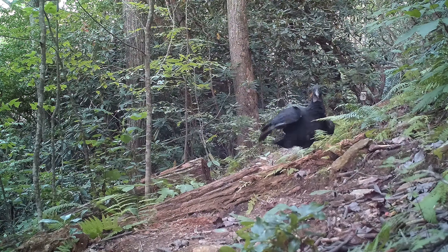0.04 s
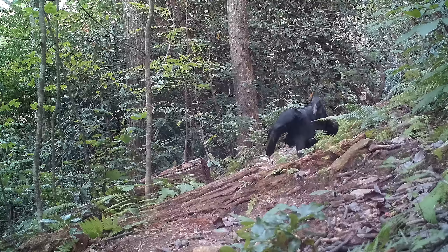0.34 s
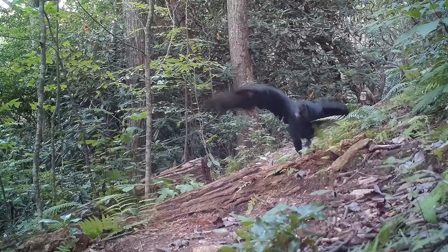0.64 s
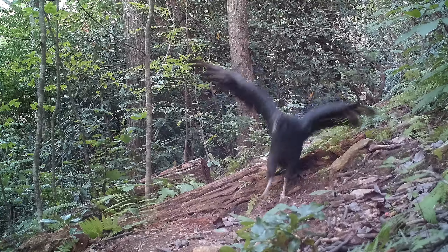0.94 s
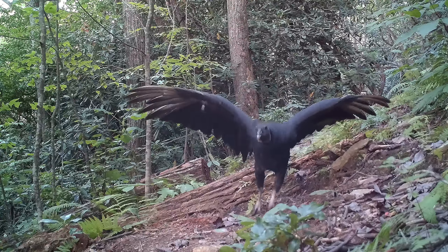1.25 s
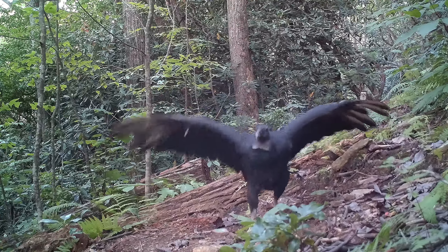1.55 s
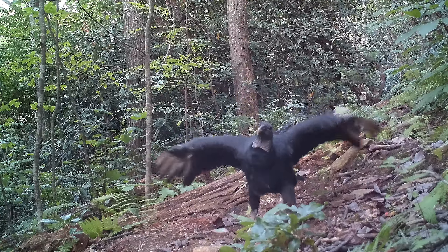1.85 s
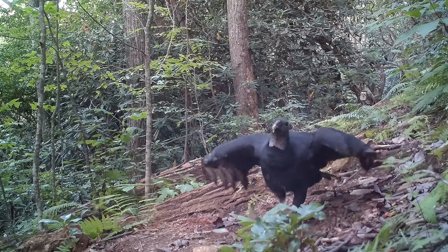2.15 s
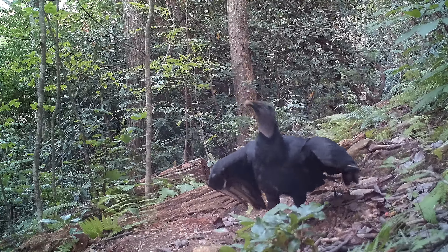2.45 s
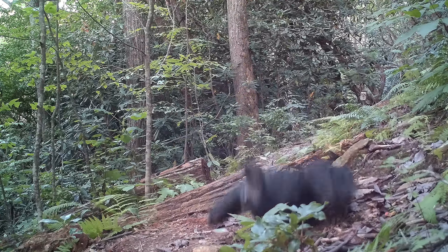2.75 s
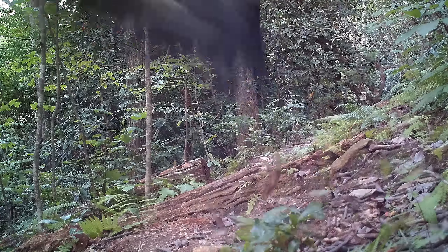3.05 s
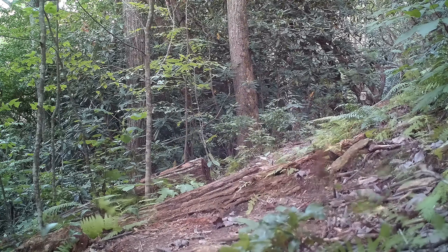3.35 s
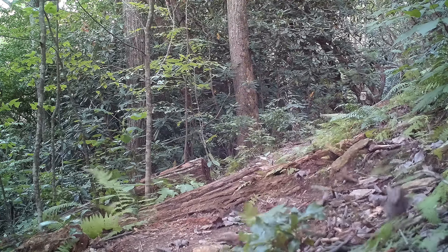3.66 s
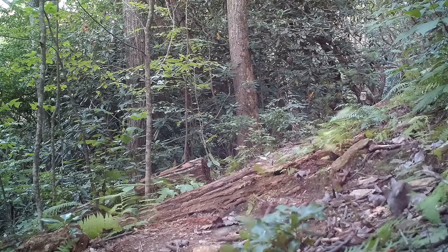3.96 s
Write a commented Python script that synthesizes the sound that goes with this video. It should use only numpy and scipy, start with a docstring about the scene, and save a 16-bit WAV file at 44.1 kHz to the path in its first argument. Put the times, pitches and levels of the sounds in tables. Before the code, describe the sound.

A vulture takes off in a quiet forest. Over a steady high insect chorus it shuffles on dry leaves and snaps twigs, then its stiff feathers rattle and three heavy wingbeats pass close overhead, buffeting the microphone.

```python
"""Vulture taking off from a wooded slope

Over still air and a steady insect chorus, a vulture shuffles its wings and steps on dry litter.
Then it takes off: leaves stir, stiff feathers rattle as they scrape past, and three heavy wingbeats
pass close overhead, each a thump of air, a whoosh, a feather hiss and a softer upstroke.
The ground and the trunks add faint echoes. The sound is mono, alike on both channels."""
import sys
import numpy as np
from scipy import signal
from scipy.fft import rfft, irfft
from scipy.io import wavfile

SR = 44100
rng = np.random.default_rng(int(sys.argv[2]) if len(sys.argv) > 2 else 0)


def file_out(sig):
    """Save sig as 16-bit WAV at sys.argv[1]."""
    # one column per channel
    cols = np.atleast_2d(sig).T
    # limit, then scale
    lim = np.clip(cols, -1, 1)
    pcm = np.round(lim * 32767).astype(np.int16)
    wavfile.write(sys.argv[1], SR, pcm)


N = 176400
TIME = np.arange(N) / SR


def amp(db):
    """Decibels to gain."""
    return 10 ** (np.asarray(db) / 20)


def unit_rms(x):
    """Scales to an rms of one."""
    return x / np.sqrt(np.mean(x ** 2) + 1e-20)


def add(mix, start_s, sound):
    """Drops a sound into the mix."""
    part = mix[round(start_s * SR):][:len(sound)]
    part += sound[:len(part)]


def octaves(size):
    """The bins of a spectrum, in octaves."""
    return np.log2(np.fft.rfftfreq(size, 1 / SR) + 1)


def colour(x, eq, tilt_db=0):
    """Applies an EQ curve and a tilt per octave, at rms one."""
    hz, db = np.transpose(eq)
    bins = octaves(len(x))
    curve_db = np.interp(bins, np.log2(hz), db) + tilt_db * np.clip(bins - np.log2(hz[0]), 0, None)
    return unit_rms(irfft(rfft(x) * amp(curve_db), len(x)))


def wander(size, hz):
    """A random drift at about the given rate."""
    return np.interp(np.arange(size) * hz / SR, np.arange(size), rng.standard_normal(size))


def crackle(size, grain_db, clump_hz):
    """Noise that comes in tiny uneven clumps."""
    return rng.standard_normal(size) * amp(grain_db * np.clip(wander(size, clump_hz), -2, 2))


def swell(length_s, peak):
    """A smooth arch; peak is the share of its length at which it tops."""
    progress = np.arange(0, length_s, 1 / SR) / length_s
    return np.sin(np.pi * np.interp(progress, [0, peak, 1], [0, .5, 1])) ** 2


def resonate(x, hz, width_hz):
    """A steep resonance that follows a pitch curve, at rms one."""
    carrier = np.exp(2j * np.pi * np.cumsum(hz * np.ones(len(x))) / SR)
    pole = np.exp(-np.pi * width_hz / SR)
    return unit_rms((carrier * signal.lfilter([1], [1, -2 * pole, pole * pole], x / carrier)).real)


def forest_air():
    """Still air under the trees: a soft, dark bed of noise."""
    # air spectrum: f/Hz, level/dB
    air_eq = [(20, -5), (38, 0.5), (65, -0.5), (95, -3), (128, 2), (180, -3), (400, -6.5), (1000, -11.5),
              (2200, -16.5), (5000, -20.5), (9000, -24), (15500, -28)]
    return amp(-41) * colour(rng.standard_normal(N), air_eq)


def insects():
    """A chorus of insects merges into one high, finely pulsing band."""
    # chorus spectrum: f/Hz, level/dB
    chorus_eq = [(4000, -73), (5400, -22), (5850, -14), (6200, -6.5), (6550, -1.5), (6850, -7.5),
                 (7200, -16), (7800, -28.5), (10000, -61)]
    chorus = colour(crackle(N, grain_db=1, clump_hz=89.2), chorus_eq)
    return amp(-39.5 + .5 * wander(N, hz=7.56)) * chorus


def rustles(attack_s=0.005):
    """Feathers brush over each other and the litter in sprays of small grains that die away."""
    # brushes: t/s, length/s, level/dB, tilt/(dB per octave), fade-out/share of length
    brushes = [(0.482, 0.19, -51, 1, 0.49), (0.97, 0.42, -49, -2.5, 0.53), (1.102, 0.028, -45, -5, 0.68),
               (1.554, 0.056, -35, -1, 0.21), (1.601, 0.15, -43.5, 0, 0.72),
               (1.728, 0.068, -33.5, -1.5, 0.22), (1.795, 0.25, -44, 0, 0.78),
               (2.246, 0.047, -39, -1.5, .6), (2.277, 0.14, -38, -1.5, .4), (2.498, 0.14, -42.5, -3, 0.6),
               (2.686, 0.018, -37, 0, 0.55), (2.737, 0.034, -42, 3, 0.61), (2.815, .02, -42, 2, .3),
               (2.983, 0.066, -41.5, 1, .2), (3.029, 0.075, -34.5, -1, 0.55)]
    # brushing spectrum: f/Hz, level/dB
    brush_eq = [(300, -47), (1100, -12), (1900, -5), (3100, -1.5), (6000, 1), (8500, -3.5), (12000, -9.5),
                (15500, -22)]
    out = np.zeros(N)
    for start, length, db, tilt_db, fade in brushes:
        t = np.arange(0, length, 1 / SR)
        envelope = np.minimum(t / attack_s, 1) * np.minimum((1 - t / length) / fade, 1)
        clumps = unit_rms(amp(3 * wander(len(t), hz=123)))
        grains = colour(crackle(len(t), grain_db=4, clump_hz=1191), brush_eq, tilt_db)
        add(out, start, amp(db) * envelope * clumps * grains)
    return out


def snaps(attack_s=0.00026, tip_octaves=0.12, size=2048):
    """Twigs and quills snap: short dry cracks, each centred on one pitch."""
    # cracks: t/s, level/dB, f/Hz, decay/s, roll-off either side of f/(dB per octave)
    cracks = [(1.0988, -27, 2500, 0.0011, 16), (1.566, -28, 9500, .002, 12),
              (1.580, -22.5, 6860, 0.0012, 12), (1.5946, -19.5, 7300, 0.0012, 10),
              (1.7758, -11.5, 4400, 0.00065, 11.5), (1.779, -26.5, 4660, 0.0053, 30),
              (1.827, -22, 6350, 0.00078, 16), (2.2495, -29, 4400, 0.00061, 12),
              (2.3437, -28.5, 4200, 0.0017, 10), (2.351, -27.5, 6000, 0.0018, 21),
              (2.504, -33, 3200, 0.0019, 14), (2.5195, -23, 3780, 0.002, 20),
              (3.047, -28.5, 3200, 0.006, 17), (3.111, -14, 5100, 0.00097, 30),
              (3.136, -6, 7200, 0.0014, 71), (3.2064, -14, 5200, .0007, 32),
              (3.2194, -20, 1880, 0.0038, 92), (3.3081, -9, 5900, 0.00046, 38),
              (3.3372, -13.5, 5713, .0008, 38), (3.412, -18.5, 5320, 0.009, 19),
              (3.456, -25, 4000, .007, 4), (3.612, -9.5, 5340, 0.0034, 13), (3.631, -24, 5500, .003, 3),
              (3.772, -23.5, 4100, 0.0038, 7), (3.821, -23, 4800, .003, 15), (3.875, -21, 5000, 0.003, 14),
              (3.9379, -15.5, 4520, 0.0028, 25)]
    t, out = np.arange(size) / SR, np.zeros(N)
    for start, db, hz, decay, slope_db in cracks:
        spectrum = amp(-slope_db * np.hypot(octaves(size) - np.log2(hz), tip_octaves))
        burst = irfft(spectrum * np.exp(2j * np.pi * rng.random(len(spectrum))))
        envelope = np.minimum(t / attack_s, 1) * np.exp(-t / decay)
        add(out, start, amp(db) * unit_rms(burst * envelope) * np.sqrt(decay * SR / size))
    return out


def wake():
    """Stirred leaves and feathers fizz while the bird's draught buffets the microphone."""
    # fader moves: t/s, leaves level/dB, draught level/dB
    faders = [(3.05, -36, -68), (3.1, -39.5, -58), (3.14, -23.5, -53), (3.2, -32, -52), (3.24, -20.5, -49),
              (3.29, -27.5, -34), (3.362, -25.5, -34), (3.38, -30.5, -43), (3.429, -25, -25),
              (3.5, -27, -48), (3.545, -27, -29), (3.58, -31, -33), (3.645, -24, -38), (3.7, -30, -40),
              (3.79, -30.5, -39), (3.845, -25, -34), (3.91, -35, -38), (3.948, -22.5, -38),
              (3.965, -35.5, -51), (4, -30.5, -39)]
    # leaf spectrum: f/Hz, level/dB
    leaves_eq = [(150, 2.5), (600, -0.5), (1000, -1), (2500, 0.5), (5000, 1), (7500, -1.5), (10000, -5),
                 (13000, -9.5), (15500, -21)]
    # draught spectrum: f/Hz, level/dB
    draught_eq = [(15, -6), (28, -4), (45, -1), (90, -11), (140, -11), (400, -39), (2000, -70)]
    times, leaves_db, draught_db = np.transpose(faders)
    leaves = colour(crackle(N, grain_db=2.5, clump_hz=600.3), leaves_eq)
    draught = colour(rng.standard_normal(N), draught_eq)
    return (amp(np.interp(TIME, times, leaves_db, left=-120)) * leaves
            + amp(np.interp(TIME, times, draught_db, left=-120)) * draught)


def feather_scrape(max_slips=220, spread_db=4.5, detune=0.045, ring_size=768):
    """Stiff feathers catch and slip; each slip rings the quills, whose pitches shift as the wing bends."""
    # fader moves of three resonance groups: t/s, treble level/dB, bass level/dB, middle level/dB
    faders = [(3.09, -42, -40, -53), (3.117, -16, -23, -23), (3.14, -17, -24.5, -30),
              (3.168, -19, -28.5, -25), (3.186, -27.5, -35, -34), (3.213, -19, -28.5, -25.5),
              (3.224, -19, -40, -25), (3.232, -24.5, -38, -33), (3.28, -23.5, -34.5, -29),
              (3.306, -15, -28, -28.5), (3.352, -31, -44, -46), (3.36, -31, -40, -37)]
    # stick-slip: t/s, rate/Hz, jitter/share of period, pitch ratios for treble, bass and middle
    slips = [(3.089, 378, 0.28, 0.85, 0.82, 1.15), (3.116, 365.8, .28, 0.97, 1.11, 1.06),
             (3.142, 354.5, 0.31, 0.98, 0.78, 0.86), (3.165, 347.8, 0.31, 1, 1, 1.03),
             (3.201, 177.5, .15, 0.99, 0.9, 1), (3.226, 224.7, .2, 0.993, 1.04, 1.01),
             (3.245, 501, .5, 1.03, 1.13, 1.01), (3.28, 269.2, 0.038, 0.97, 1.26, 0.96),
             (3.31, 270, .04, 1.09, 1.22, 0.9), (3.358, 320, 0.045, 0.97, 0.96, 0.81)]
    # quill modes: f/Hz, level/dB, decay/s, group (0 treble, 1 bass, 2 middle)
    modes = [(5170, 5, 0.001, 0), (5340, 10, 0.00024, 0), (3890, -4.5, 0.00082, 0), (6670, -1, 0.00065, 0),
             (416, 3, 0.0021, 1), (220, -2.5, 0.0035, 1), (1845, 0, 0.00098, 2)]
    # band-pass of each group: gain/dB, low edge/Hz, high edge/Hz
    groups = [(-1.5, 2400, 7900), (2.5, 90, 630), (1, 1070, 2740)]
    times, *levels = np.transpose(faders)
    slip_times, rate, jitter, *bends = np.transpose(slips)
    now, end = times[0], times[-1]
    t, stems = np.arange(ring_size) / SR, np.zeros((len(groups), N))
    for late, force, *offsets in rng.standard_normal((max_slips, 2 + len(modes))):
        period = 1 / np.interp(now, slip_times, rate)
        strength = np.sqrt(period) * amp(spread_db * np.tanh(force))
        for (hz, db, decay, group), offset, phase in zip(modes, offsets, rng.random(len(modes))):
            pitch = hz * np.interp(now, slip_times, bends[round(group)]) * (1 + detune * offset)
            envelope = (t / decay) ** .35 * np.exp(-t / decay)
            ring = envelope * np.sin(2 * np.pi * (pitch * t + phase))
            if now < end:
                add(stems[round(group)], now, strength * amp(db) * ring)
        now += period * np.exp(late * np.interp(now, slip_times, jitter))
    active, out = (TIME > times[0]) & (TIME < end), np.zeros(N)
    for stem, level, (gain_db, *edges) in zip(stems, levels, groups):
        rattle = signal.sosfilt(signal.butter(4, edges, "bandpass", fs=SR, output="sos"), stem)
        out += amp(np.interp(TIME, times, level) + gain_db) * rattle / rattle[active].std()
    return out


def thump(db, hz, length_s, sag=0.194, roughness=0.53):
    """The loaded wing flutters for a few low cycles, sagging in pitch."""
    arch = swell(length_s, peak=0.39) ** 0.61
    size = len(arch)
    pitch = hz * (1 + sag * np.linspace(.5, -.5, size) + 0.098 * wander(size, hz=202))
    flutter = unit_rms(np.sin(2 * np.pi * np.cumsum(pitch) / SR))
    rumble = resonate(rng.standard_normal(size), hz, width_hz=170)
    return amp(db) * arch * unit_rms(flutter + roughness * rumble)


def whoosh(db, low_hz, high_hz, high_db, rise_octaves, flutter_hz):
    """Air tears off the fluttering wing edge in two hollow bands that rise through the downstroke."""
    # spectrum of rushing air: f/Hz, level/dB
    rush_eq = [(40, -25), (200, 4.5), (370, -8), (520, -10), (900, -1), (1100, -6.5), (1350, -3.5),
               (1900, -12.5), (4000, -11), (15000, -45)]
    arch = swell(length_s=0.055, peak=0.39) ** 0.45
    size = len(arch)
    glide = 2 ** (rise_octaves * np.linspace(-.5, .5, size))
    low, high, air = rng.standard_normal((size, 3)).T
    low_band = amp(-1) * resonate(low, low_hz * glide, width_hz=354)
    high_band = amp(high_db) * resonate(high, high_hz * glide, width_hz=354)
    flutter = 1 + 0.34 * np.cos(2 * np.pi * flutter_hz * TIME[:size])
    rush = amp(-2.5) * colour(air * flutter, rush_eq)
    return amp(db) * arch * (low_band + high_band + rush)


def feather_hiss(db):
    """The flight feathers slide over each other at the bottom of the stroke."""
    # spectrum of sliding feathers: f/Hz, level/dB
    hiss_eq = [(300, -8), (1500, 1), (2600, 1), (5200, -12), (8000, -10), (12000, -15), (15500, -26)]
    arch = swell(length_s=0.078, peak=0.49) ** 2
    return amp(db) * arch * colour(crackle(len(arch), grain_db=4.5, clump_hz=890), hiss_eq)


def upstroke(db, hz, puff_db):
    """A softer, hollow rush and a low puff as the wing lifts again."""
    # spectrum of air over the lifting wing: f/Hz, level/dB
    lift_eq = [(100, -5), (340, -8), (520, 5.5), (800, -7), (1050, -7), (1350, 1.5), (1900, -7),
               (4000, -16), (15000, -32)]
    arch = swell(length_s=0.0895, peak=0.78) ** 0.16
    edge, air, push = rng.standard_normal((len(arch), 3)).T
    rush = amp(-2.5) * resonate(edge, hz, width_hz=420) + colour(air, lift_eq)
    puff = resonate(push, hz=145, width_hz=90)
    return arch * (amp(db) * rush + amp(puff_db) * puff)


def wingbeats(lift_delay_s=0.072):
    """Three heavy beats: thump, whoosh and hiss layered on the way down, then the upstroke."""
    # beats: t/s; thump level/dB, f/Hz, length/s; whoosh level/dB, low f/Hz, high f/Hz,
    # high band gain/dB, rise/octaves; hiss level/dB; upstroke level/dB, f/Hz, puff level/dB
    beats = [(3.381, -18, 180, 0.06, -20, 490, 1240, -2, 0.22, -21, -29, 900, -27),
             (3.582, -16.5, 198, 0.039, -22, 613, 1010, -0.5, 0.65, -21.5, -30, 556, -30),
             (3.784, -19, 200, 0.041, -24.5, 480, 720, -3, 0.46, -34.5, -30, 490, -40.5)]
    out = np.zeros(N)
    for start, thump_db, flutter_hz, thump_s, *whoosh_settings, hiss_db, up_db, up_hz, puff_db in beats:
        add(out, start, thump(thump_db, flutter_hz, thump_s))
        add(out, start, whoosh(*whoosh_settings, flutter_hz))
        add(out, start, feather_hiss(hiss_db))
        add(out, start + lift_delay_s, upstroke(up_db, up_hz, puff_db))
    return out


def ground_bounce(x, cutoff_hz=2200):
    """Soft ground returns a dull copy; its shifting lag hollows out the direct sound."""
    # delay of the bounce: t/s, lag/ms
    lags = [(3.4, 1.44), (3.6, 1.13), (3.72, 1.45), (3.9, 1.56)]
    times, lag_ms = np.transpose(lags)
    dull = irfft(rfft(x) / (1 + (np.fft.rfftfreq(N, 1 / SR) / cutoff_hz) ** 4), N)
    return np.interp(TIME - np.interp(TIME, times, lag_ms) / 1000, TIME, dull)


def forest_echoes(x, t60_s=0.17, echoes_per_s=2500, predelay_s=.003):
    """The ground and the trunks scatter a short tail of echoes."""
    t = np.arange(SR // 2) / SR
    taps = rng.standard_normal(len(t)) * (rng.random(len(t)) < echoes_per_s / SR)
    taps *= (t > predelay_s) * amp(-60 * t / t60_s)
    return signal.fftconvolve(x, taps / np.linalg.norm(taps))[:N]


def scene():
    """The bird and its echoes over the forest bed."""
    bed = forest_air() + insects()
    foley = rustles() + snaps() + feather_scrape()
    flight = wake() + wingbeats()
    bird = foley + flight + amp(-9) * ground_bounce(flight)
    return np.tile(bed + bird + amp(-15.5) * forest_echoes(bird), (2, 1))


def record(dry, ceiling=.88, cutoff_hz=15500):
    """The loudest peaks clip, then a steep low-pass trims the top."""
    lowpass = signal.firwin(511, cutoff_hz, window=("kaiser", 9), fs=SR)
    return signal.oaconvolve(np.clip(dry, -ceiling, ceiling), lowpass[None], "same")


dry = scene()
out = record(dry)
file_out(out)
```